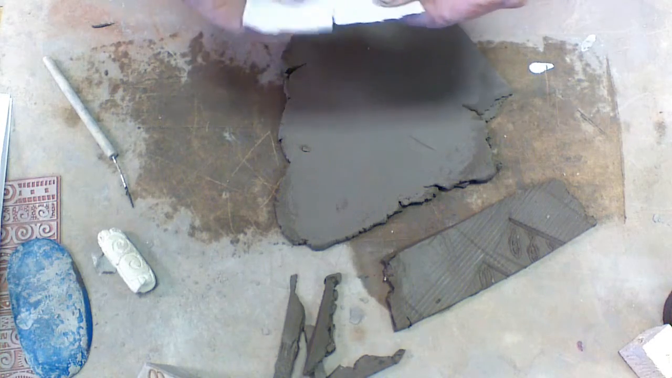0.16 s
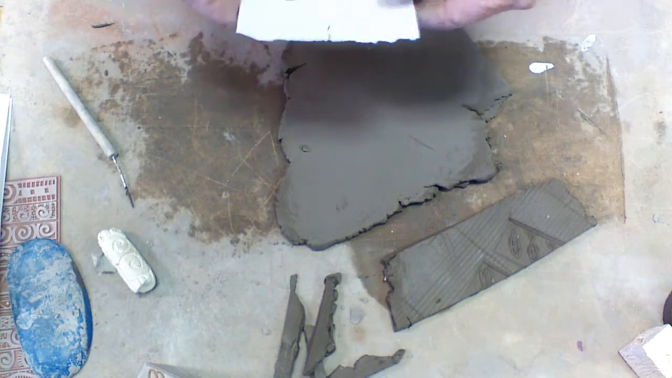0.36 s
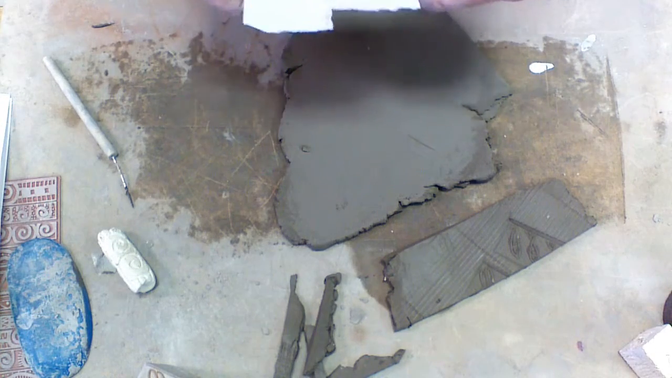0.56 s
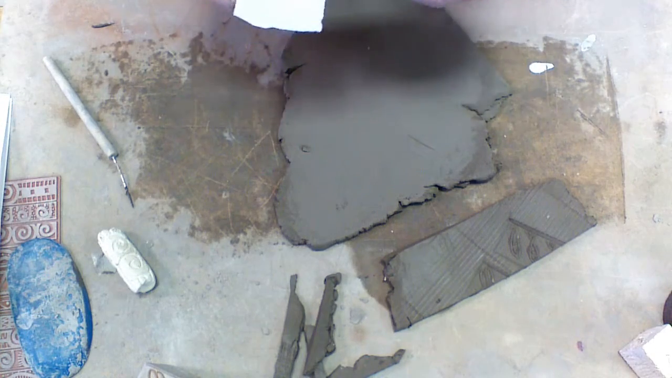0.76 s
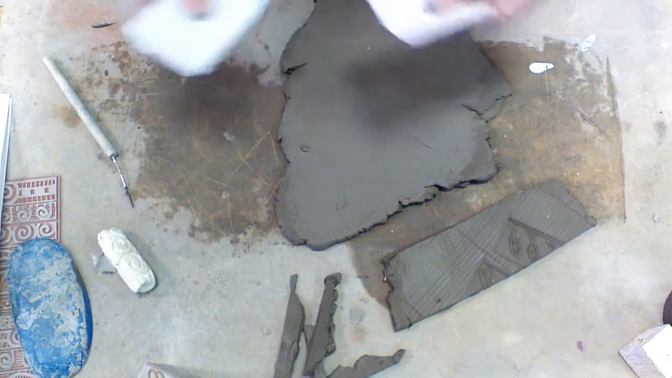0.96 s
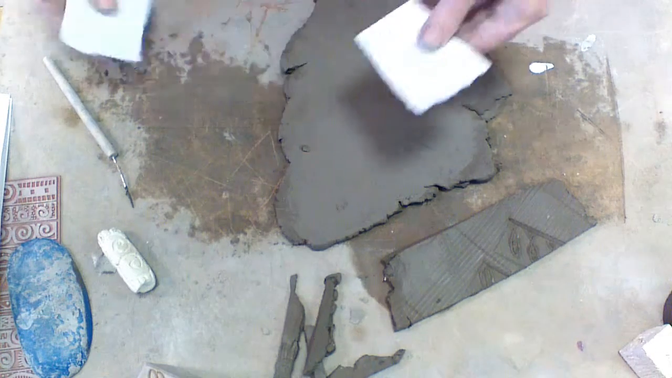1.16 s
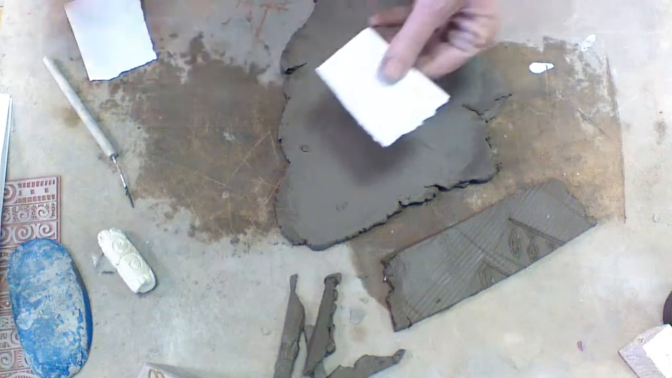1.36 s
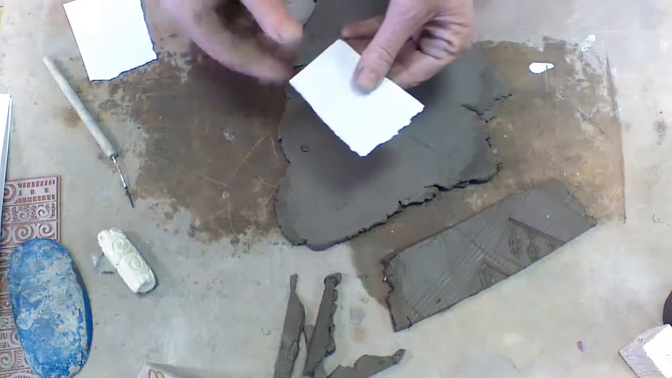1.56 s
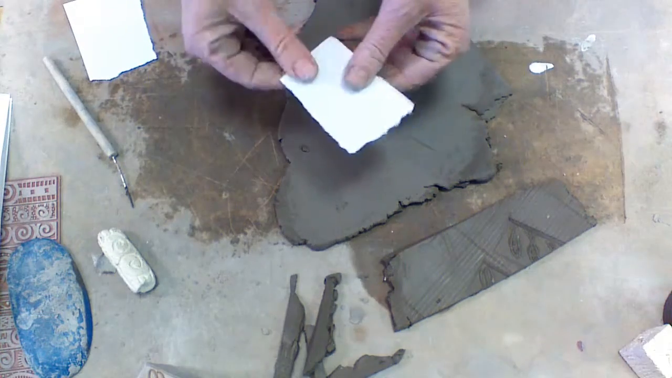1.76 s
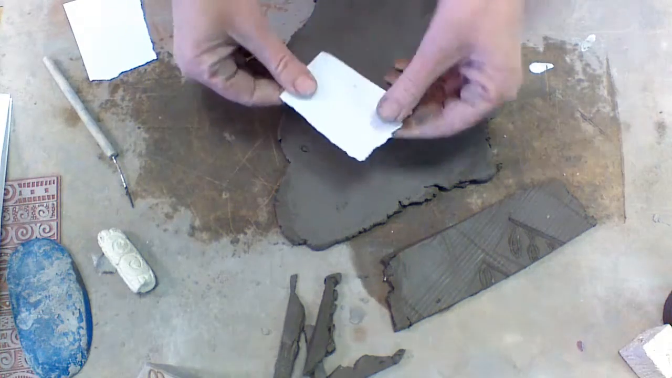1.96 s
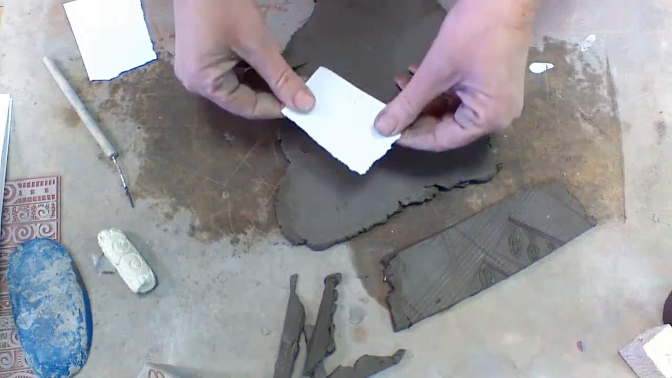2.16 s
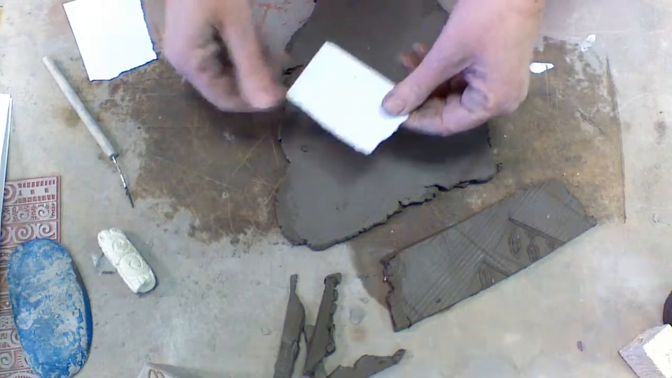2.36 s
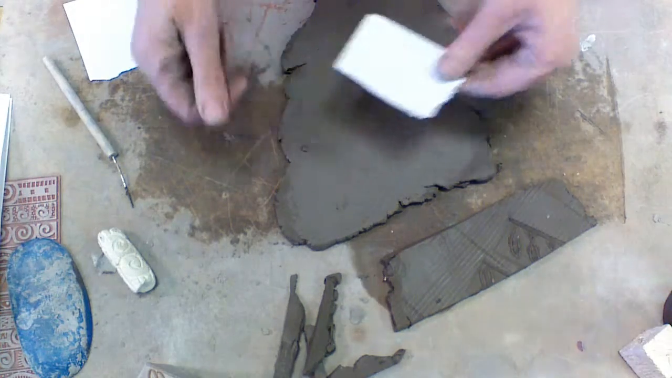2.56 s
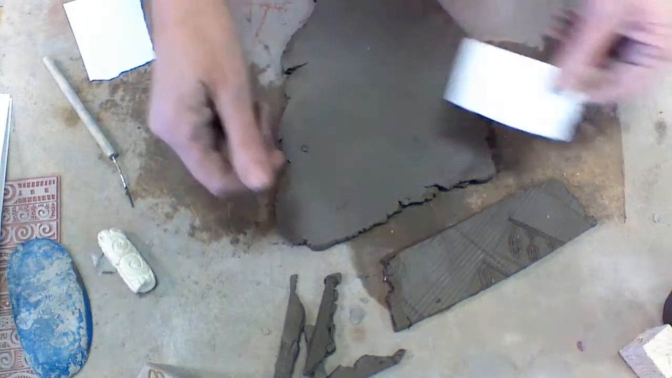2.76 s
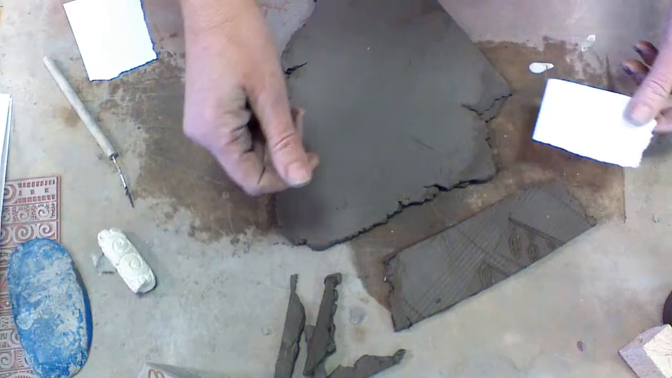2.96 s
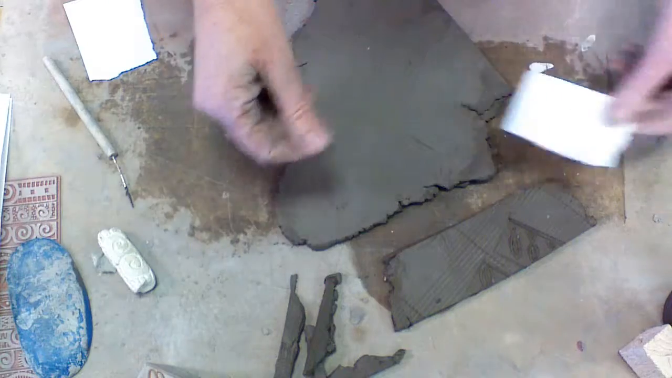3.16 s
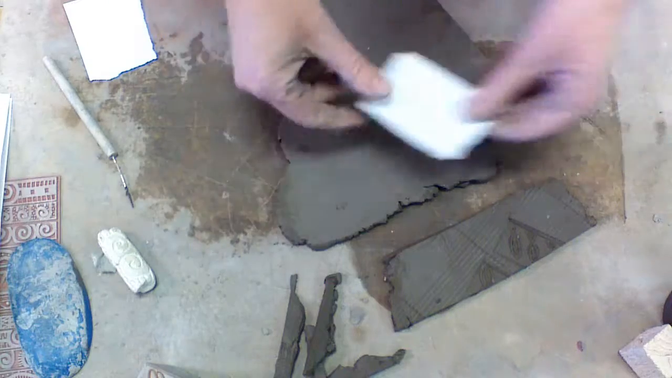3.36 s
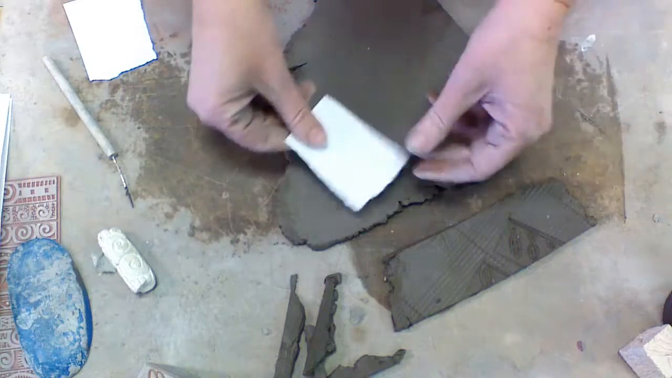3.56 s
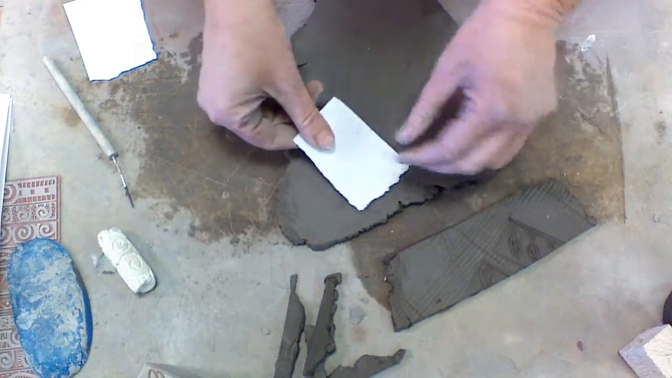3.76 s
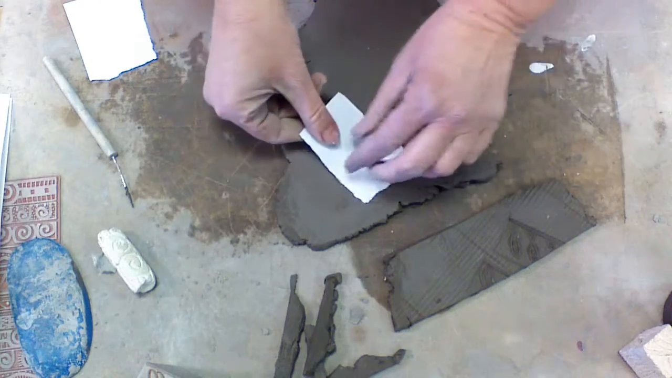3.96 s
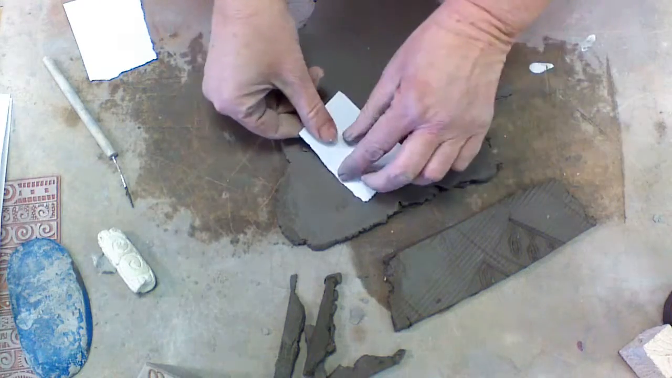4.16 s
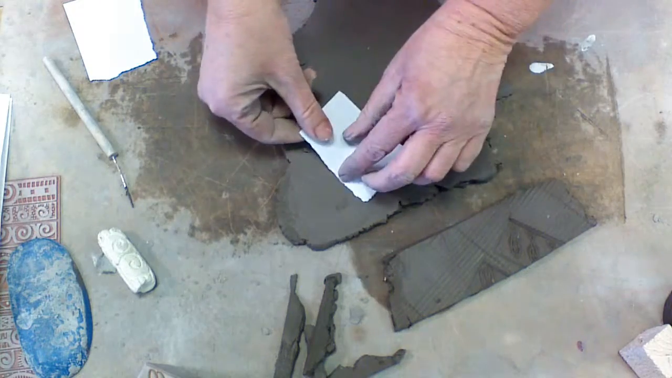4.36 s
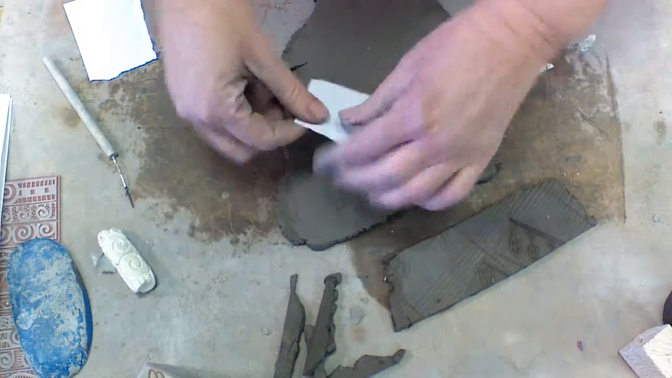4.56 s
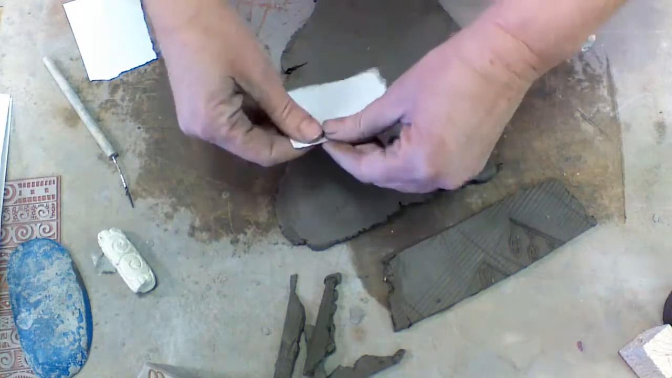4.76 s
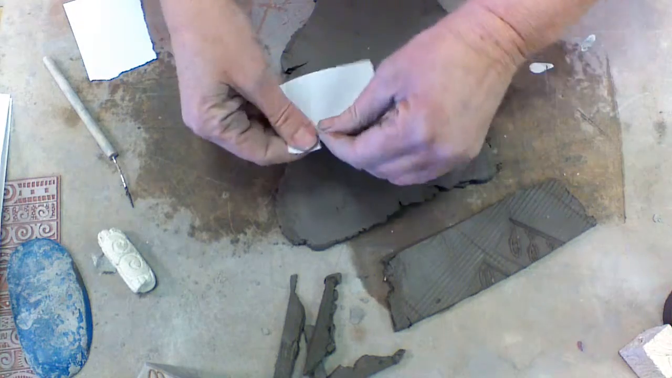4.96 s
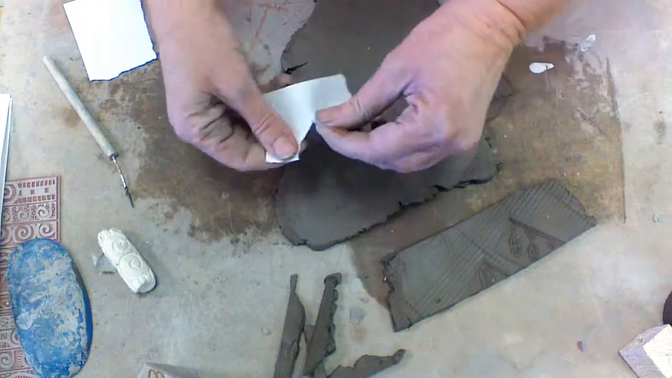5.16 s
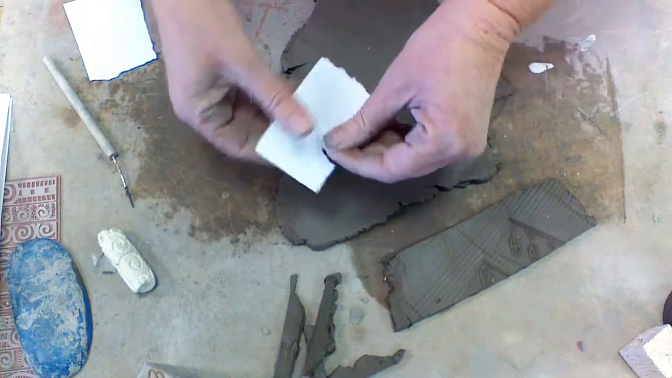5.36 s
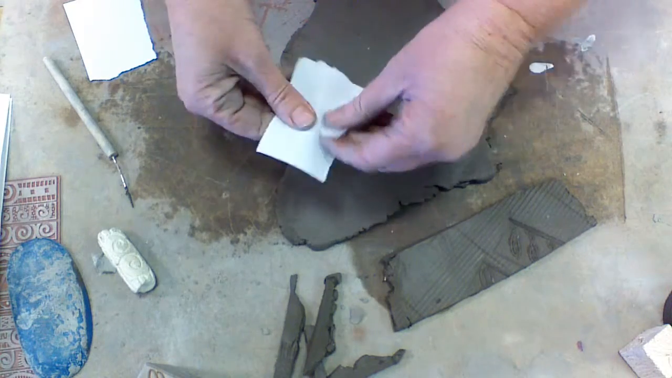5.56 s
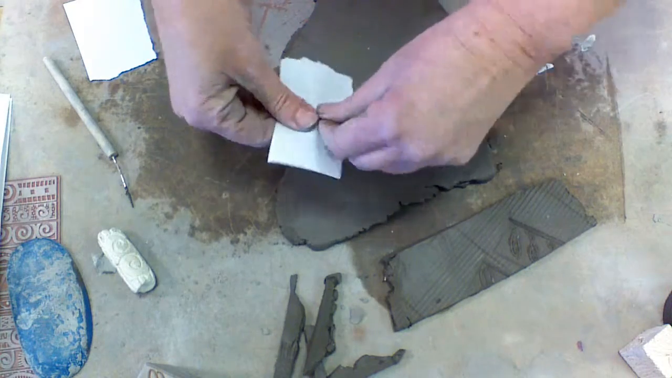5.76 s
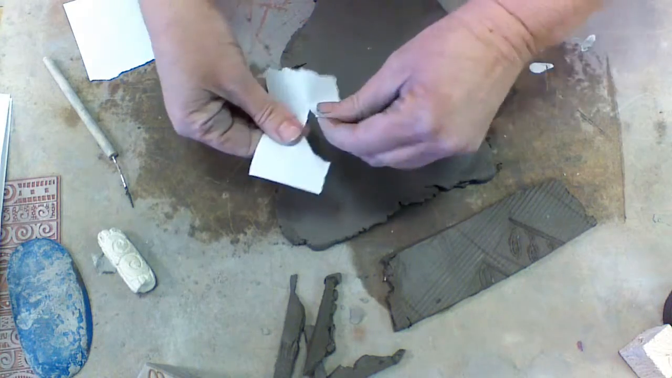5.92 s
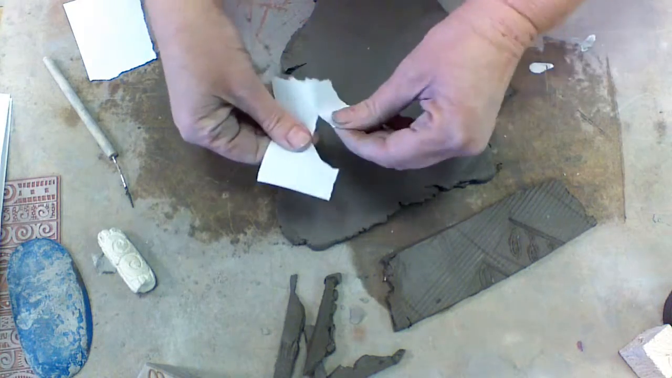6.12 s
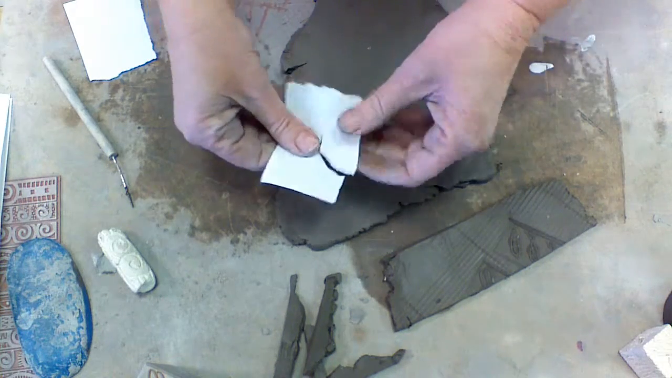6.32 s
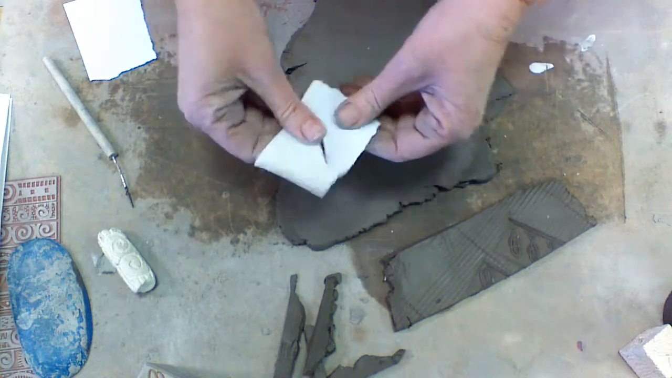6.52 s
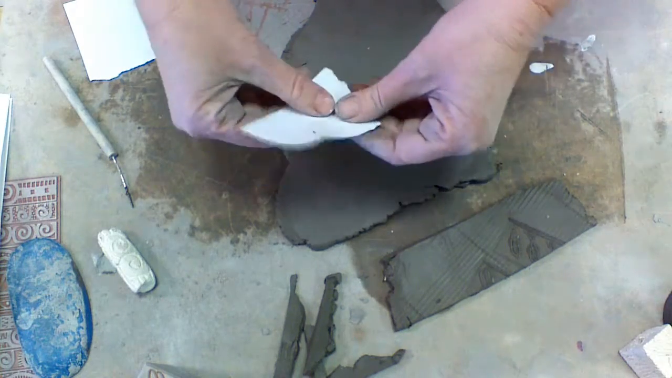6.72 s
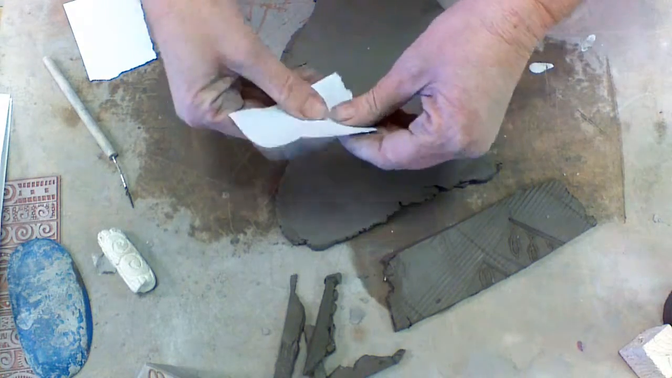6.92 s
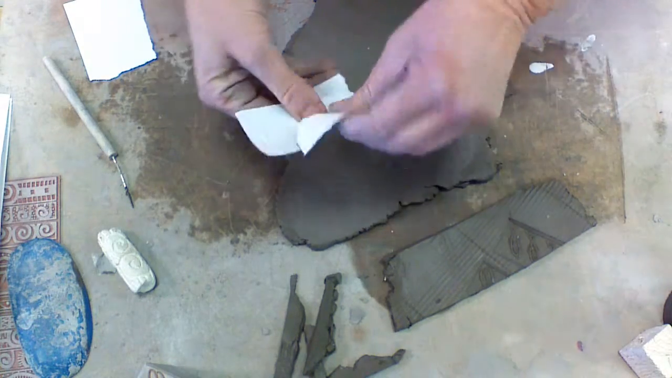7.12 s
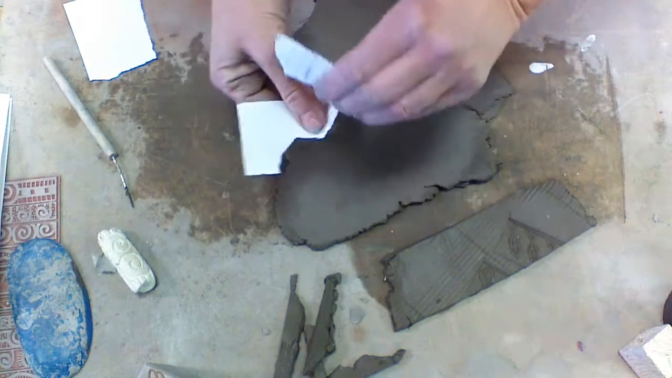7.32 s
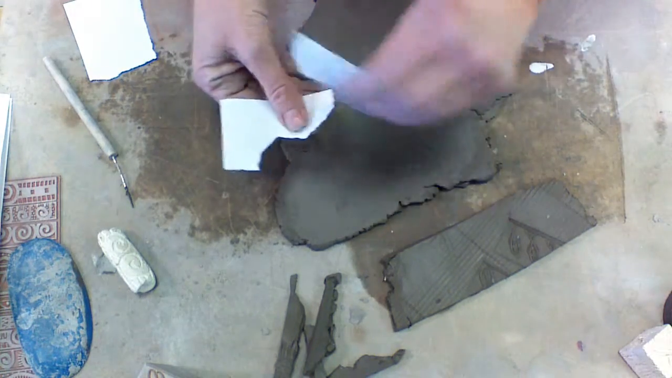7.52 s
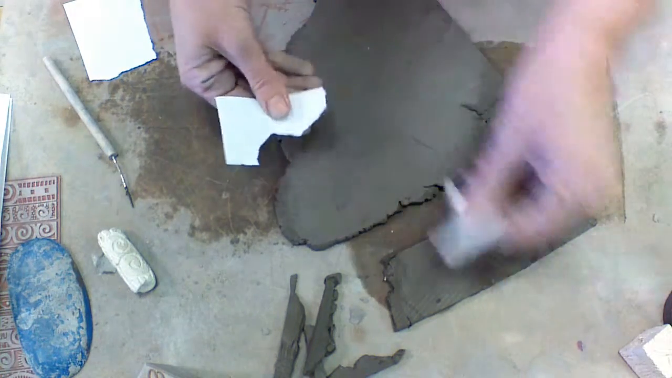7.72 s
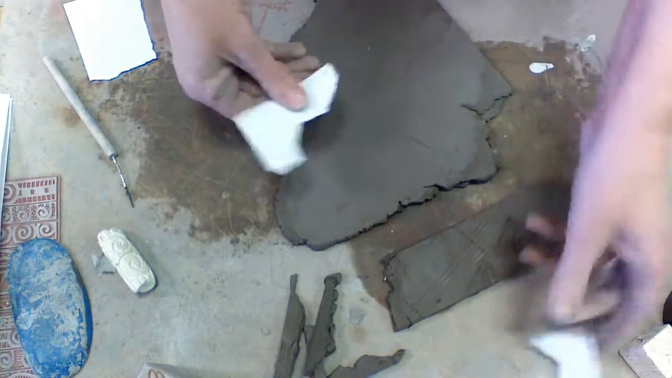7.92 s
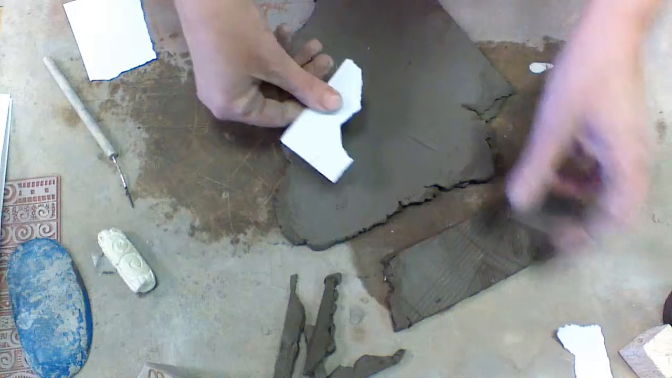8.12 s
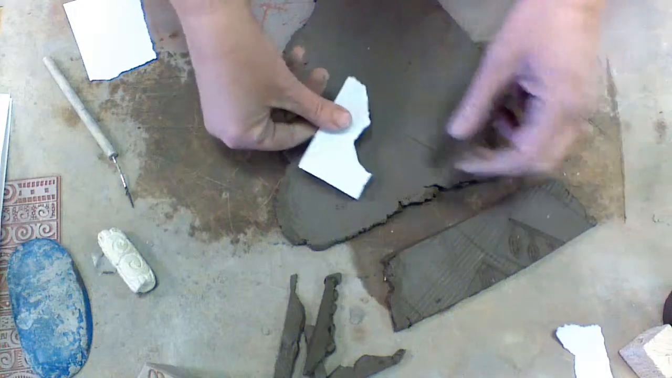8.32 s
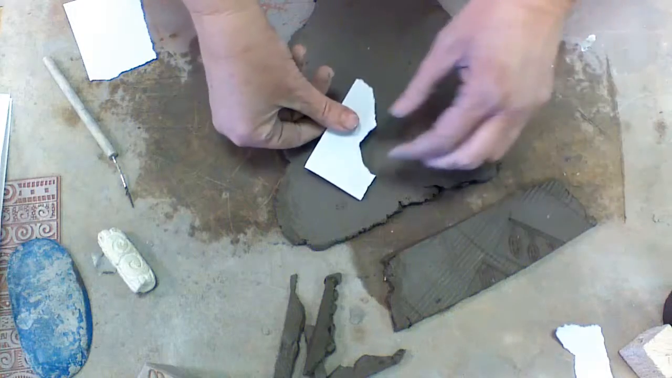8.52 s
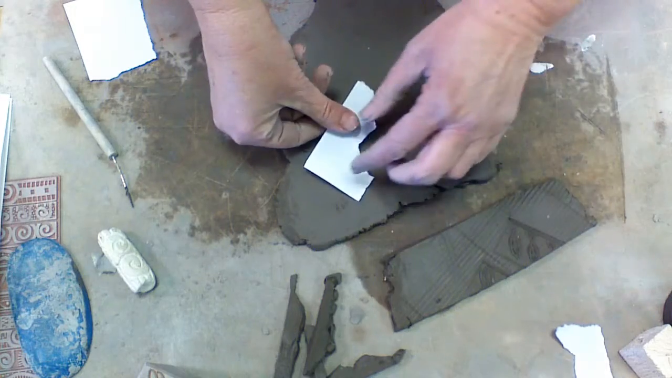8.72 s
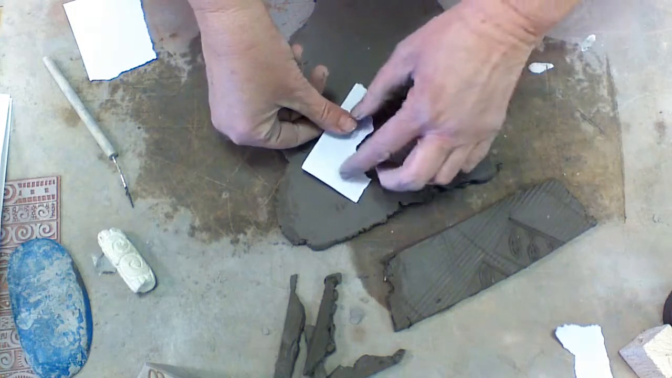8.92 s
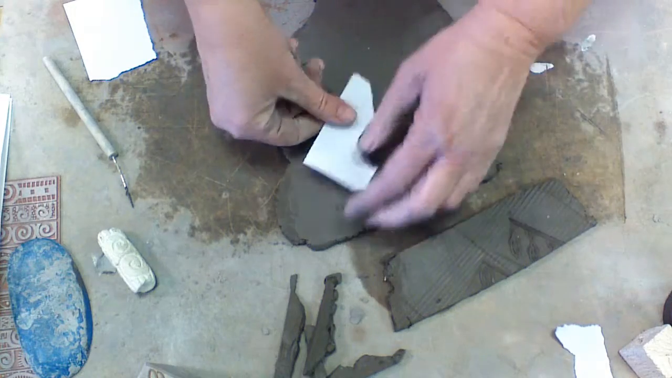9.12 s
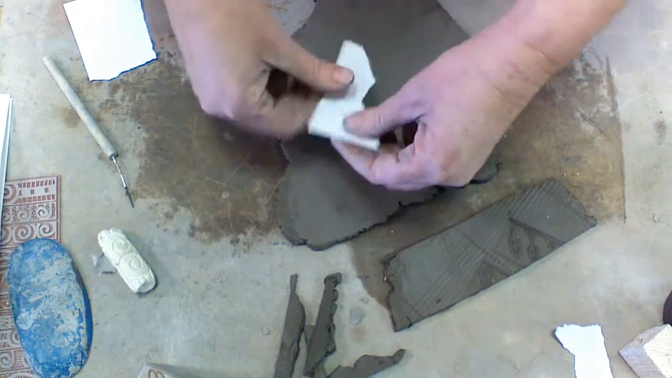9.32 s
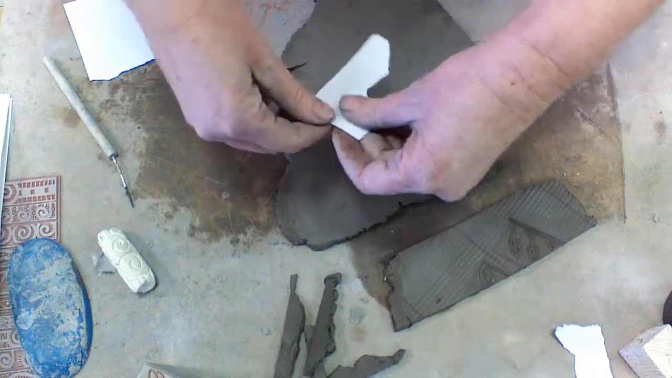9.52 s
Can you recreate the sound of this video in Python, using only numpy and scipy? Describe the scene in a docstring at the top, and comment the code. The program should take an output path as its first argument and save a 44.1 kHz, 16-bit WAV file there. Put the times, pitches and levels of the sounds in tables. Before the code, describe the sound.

Two hands tear stiff paper above a work table. Lively rustling opens, a quick rip comes within the first second, then near silence with soft rubs. Midway come bright bursts of tearing, a hard flick and crisp buckles, then another rip with a loud snap. Soft handling closes. Close stereo pickup, slight room reflections, steady low air rumble and hum.

```python
"""Tearing stiff paper

Two hands tear small pieces off a sheet of stiff paper above a work table, close to a pair of small microphones.
Breaking fibres are dense random clicks, thicker bundles short avalanches, sliding fingers a softer rustle;
buckles excite damped resonances, and a strip still holding rings at rising pitch.
Ventilation adds shaped noise, throbbing low modes and a hum of wavering sines."""
import sys
import numpy as np
from scipy import signal
from scipy.fft import rfft, irfft, next_fast_len
from scipy.io import wavfile
from scipy.ndimage import uniform_filter1d, map_coordinates

SR = 44100
rng = np.random.default_rng(int(sys.argv[2]) if len(sys.argv) > 2 else 0)


def transcribe(u):
    """Save the signal u as a 16-bit wav file named by the first command-line argument.

    u: samples, shape (n,) or (channels, n), limited to [-1, 1]; the rate is SR.
    q: integer samples, one column per channel.
    """
    v = np.clip(np.atleast_2d(u).T, -1, 1)
    q = np.round(v * 32767).astype(np.int16)
    wavfile.write(sys.argv[1], SR, q)


N = 426888
TIME = np.arange(N) / SR


def from_db(db):
    """Logarithmic level: 20 dB is a factor of ten in amplitude."""
    return 10 ** (np.asarray(db) / 20)


def rms_one(x):
    """Power normalization: scale to an rms of 1."""
    return x / np.sqrt(np.mean(x ** 2) + 1e-20)


def at_hz(points, hz):
    """Spectral interpolation: levels in dB run straight along a log-frequency axis."""
    f, db = np.transpose(points)
    return np.interp(np.log(hz + 1e-3), np.log(f), db)


def convolve(x, response):
    """Linear superposition: every sample of a sound launches the impulse response."""
    kernel = response if x.ndim == 1 else response[None]
    return signal.oaconvolve(x, kernel, axes=-1)[..., :N]


def colour(x, spectrum, size=16384):
    """Minimum-phase filtering: a causal response shapes the spectrum and keeps the power of white noise."""
    hz = np.arange(size // 2 + 1) * SR / size
    cepstrum = irfft(np.log(from_db(at_hz(spectrum, hz))))
    # folding the cepstrum onto positive times makes the response causal
    cepstrum[1:size // 2] *= 2
    cepstrum[size // 2 + 1:] = 0
    response = irfft(np.exp(rfft(cepstrum)))
    return convolve(x, response / np.linalg.norm(response))


def shade(x, spectrum, share=1):
    """Zero-phase equalization: gain by frequency, its decibels multiplied by share."""
    size = next_fast_len(N, True)
    hz = np.arange(size // 2 + 1) * SR / size
    gain = from_db(share * at_hz(spectrum, hz))
    return irfft(rfft(x, size) * gain, size)[:N]


def drift(per_s):
    """Band-limited chance: lines join per_s random values each second, at an rms of 1."""
    knots = rng.standard_normal(N // 8)
    return rms_one(np.interp(TIME * per_s, np.arange(len(knots)), knots))


def resonate(x, hz, width_hz):
    """Damped resonance: a two-pole mode with gain 1 at its peak."""
    r = np.exp(-np.pi * width_hz / SR)
    poles = [1, -2 * r * np.cos(2 * np.pi * hz / SR), r * r]
    return signal.lfilter([1, 0, -1], poles, x + 1e-18) * (1 - r * r) / 2


def two_sided(draw, apart):
    """Partial coherence: sources lie all over the paper, so each microphone hears a share of its own."""
    shared = np.sqrt(1 - apart) * draw()
    own = np.sqrt(apart) * np.array([draw(), draw()])
    return shared + own


def arch(start_s, swell_s, fade_s, depth_db, curve):
    """Movement envelope: it sets in depth_db under its peak, swells, fades as far again and stops."""
    late = TIME - start_s - swell_s
    during = (late > -swell_s) & (late < fade_s)
    from_peak = np.maximum(-late[during] / max(swell_s, 1e-4), late[during] / max(fade_s, 1e-4))
    gain = np.zeros(N)
    gain[during] = from_db(-depth_db * from_peak ** curve)
    return gain


def strokes(rows, depth_db, curve):
    """Energy addition: the powers of overlapping movements sum, at the fibres and in the body of the sheet."""
    fibres, body = np.zeros((2, N))
    for start_s, swell_s, fade_s, db, body_db in rows:
        power = (from_db(db) * arch(start_s, swell_s, fade_s, depth_db, curve)) ** 2
        fibres += power
        body += power * from_db(body_db) ** 2
    return uniform_filter1d(np.sqrt([fibres, body]), size=64)


def crackle(per_s, spread_db):
    """Random impulse process: clicks of uneven size at an even overall strength."""
    chance, size = rng.random((2, N))
    hit = chance < per_s / SR
    # the sign of the lean is the direction of the break; values near zero give the rare outlying sizes
    lean = 2 * size[hit] - 1
    rarity = np.minimum(-np.log(np.abs(lean) + 1e-9), 4)
    clicks = np.zeros(N)
    clicks[hit] = np.sign(lean) * from_db(spread_db * rarity)
    clicks[hit] /= np.sqrt(uniform_filter1d(clicks ** 2, size=700)[hit] + 1e-3)
    return clicks


def avalanche(swell_s, size=1800):
    """Avalanche of fracture: a flurry of tiny breaks swells for a moment, then dies away."""
    age = np.arange(size) / SR / max(swell_s, 1e-4)
    return (age * np.exp(1 - age)) ** 2 * rng.choice([-1, 1], size)


def place(times, levels_db, sounds):
    """Superposition in time: short sounds add where they overlap."""
    out = np.zeros(N + SR)
    for s, db, sound in zip(times, levels_db, sounds):
        at = max(round(s * SR), 0)
        out[at:at + len(sound)] += from_db(db) * sound
    return out[:N]


def bursts(times, levels_db, swell_s):
    """Separate fractures: one avalanche at each of the given times."""
    return place(times, levels_db, map(avalanche, np.broadcast_to(swell_s, len(times))))


# Colour of the air rumble. Each row: frequency in Hz, relative level in dB.
RUMBLE_COLOUR = [(12, -9.5), (22, 3), (40, -2), (52, -2), (68, -8.5), (84, -12), (112, -10), (150, -13.5),
                 (200, -17), (240, -20), (320, -30), (450, -34), (700, -50.5), (1500, -70)]
# Colour of the hiss. Each row: frequency in Hz, relative level in dB.
HISS_COLOUR = [(240, -29), (400, -2.5), (474, -4), (512, -13), (666, -6.5), (1010, -18.5), (1350, -11),
               (1460, -19), (2290, -25.5), (4180, -25), (4950, -25), (6640, -16), (10700, -24.5),
               (15000, -16), (16000, -15)]


def air_noise(rumble_db=-37.0, hiss_db=-56.5):
    """Broadband noise: low air rumble and faint hiss, each a filtered random signal."""
    low, high = rng.standard_normal((2, N))
    return from_db(rumble_db) * colour(low, RUMBLE_COLOUR) + from_db(hiss_db) * colour(high, HISS_COLOUR)


# Hum of the ventilation. Each row: frequency in Hz, rms level in dB before the microphone colour.
HUM_TONES = [(59.7, -41.5), (119.4, -49), (178, -60.5), (229, -58), (360, -72.5)]
# Air modes throbbing in the ventilation.
# Each row: frequency in Hz, width in Hz, rms level in dB before the microphone colour.
AIR_MODES = [(30, 2.66, -39.5), (37.2, 1.88, -40), (147.68, 5.4, -55.5)]
# Side of the air noise relative to its middle. Each row: frequency in Hz, level in dB.
SIDE_LEVEL = [(30, -15), (70, -20), (170, -18), (350, -9), (700, -2.5), (1400, 3.5), (3000, 6.5), (8000, 1),
              (15000, 3)]
# Microphone colour, of which each side takes a share. Each row: frequency in Hz, gain in dB for a share of 1.
BACKGROUND_BALANCE = [(1000, 0.5), (4500, 0), (6500, 5), (8200, 7), (11000, -3.5), (15000, -5)]


def background(waver_rad=0.39):
    """Noise-driven resonance and phase modulation: air modes throb and the hum wavers within the air noise."""
    hum, throb = np.zeros((2, N))
    for hz, db in HUM_TONES:
        phase = 2 * np.pi * hz * TIME + waver_rad * drift(per_s=7)
        hum += np.sqrt(2) * from_db(db) * np.sin(phase)
    for hz, width_hz, db in AIR_MODES:
        throb += from_db(db) * rms_one(resonate(rng.standard_normal(N), hz, width_hz))
    mid = air_noise() + hum + throb
    side = shade(air_noise(), SIDE_LEVEL)
    left = shade(mid + side, BACKGROUND_BALANCE, 0.75)
    right = shade(mid - side, BACKGROUND_BALANCE, -0.081)
    return np.array([left, right])


# Fingers and paper sliding over each other. Each row: start in seconds, swell in seconds, fade in seconds,
# level in dB before the layer gains, body of the sheet in dB relative to it before the layer gains.
SLIDES = [(0.0, 0.0051, 0.073, -39.5, -3.5), (0.085, 0.019, 0.065, -43, -15),
          (0.17, 0.016, 0.058, -46, -15), (0.243, 0.019, 0.05, -36.5, -9), (0.315, 0.0221, .018, -42, -9),
          (0.37, .07, 0.062, -48, -7), (0.5, .08, .09, -50, -12), (1.06, 0.077, 0.111, -53.5, -9),
          (1.28, .008, 0.0153, -55.5, -11), (1.785, 0.053, 0.0315, -54, -1),
          (2.035, .015, 0.037, -49.5, -5), (2.11, 0.066, 0.16, -51.5, -7), (2.275, .02, 0.062, -49.5, -2.5),
          (3.39, 0.047, 0.022, -51, -2), (3.475, 0.017, 0.038, -43, -7), (3.53, 0.0298, 0.019, -45.5, 0),
          (4.108, 0.014, 0.28, -48.5, -14), (4.645, 0.021, 0.057, -43.5, -8),
          (4.725, 0.034, 0.068, -48, -10), (5.18, .03, .04, -48, -6), (5.245, 0.011, 0.035, -36, -11),
          (5.265, 0.036, .014, -36.5, -14), (5.358, .015, .025, -48.5, 0),
          (5.41, 0.0132, 0.0356, -46.5, -2.5), (5.46, 0.0613, .018, -48.5, -4),
          (5.535, 0.031, .14, -40.5, -6), (5.712, .023, 0.015, -36, -11), (5.752, 0.032, 0.04, -40.5, -5.5),
          (5.79, 0.0553, 0.034, -42, -7.5), (6.295, 0.033, 0.032, -41.5, -8),
          (6.498, 0.012, 0.059, -40.5, -8), (6.54, 0.069, 0.065, -39.5, -7.5),
          (6.635, 0.056, 0.047, -41, -8), (6.73, 0.032, 0.13, -51, -9), (6.865, 0.0096, 0.03, -46, -12),
          (6.9, 0.058, 0.054, -47, -9), (7.6, 0.1, 0.052, -53, -10), (7.8, 0.044, 0.063, -44, -26),
          (7.915, .045, 0.051, -45, -11), (8.035, 0.057, 0.027, -49, -12),
          (9.255, 0.0705, 0.051, -42.5, -11), (9.475, .015, .04, -52, -2.5), (9.54, 0.06, .12, -50, -9)]
# Colour of the rubbed grain. Each row: frequency in Hz, relative level in dB.
RUB_COLOUR = [(1000, -13), (2300, -20), (3500, -15.5), (5000, -8.5), (6500, 1), (8300, -7.5),
              (11500, -14.5), (15500, -11.5)]
# Colour of the body of the sheet, also heard in tearing and snapping.
# Each row: frequency in Hz, relative level in dB.
BODY_COLOUR = [(300, -10), (650, -7.5), (950, -1), (1300, 5.5), (1700, 0), (2150, -2.5), (2800, 1),
               (3600, -1), (4600, -4), (6500, -12), (12000, -30)]


def rubbing(rub_db=3.0, body_db=-0.5, uneven_db=1.5):
    """Sliding friction: skin passes over the grain of the paper with a fine, soft rustle."""
    slide, shake = strokes(SLIDES, depth_db=13.5, curve=1.1)
    grip = rms_one(from_db(uneven_db * drift(per_s=180)))
    grain = two_sided(lambda: crackle(per_s=9000, spread_db=5.0), apart=0.31) * slide
    body = two_sided(lambda: crackle(per_s=4000, spread_db=1.0), apart=0.048) * shake
    return from_db(rub_db) * colour(grain * grip, RUB_COLOUR) + from_db(body_db) * colour(body * grip, BODY_COLOUR)


def pop(hz, swell_s, width_hz):
    """Impulsive excitation: an avalanche rings one patch of the sheet, scaled to a peak of 1."""
    ring = resonate(avalanche(swell_s), hz, width_hz)
    return ring / np.abs(ring).max()


# The sheet buckling or flicking free. Each row: time in seconds, level of the dull pop in dB before the
# layer gains, crisp edge in dB relative to it before the layer gains, pitch of the pop in Hz, swell in seconds.
BUCKLE_EVENTS = [(0.029, -28.5, -15, 934, 0.0028), (0.246, -39, 14, 993, .0014),
                 (0.26, -28, 12.5, 940, 0.0022), (0.286, -40.5, -8.5, 1210, 0.0018),
                 (0.465, -24.5, -2.5, 1067, 0.0023), (0.893, -24, 14, 960, 0.0027),
                 (1.73, -35.5, 0.5, 1100, 0.0027), (1.751, -28.5, -4.5, 1300, 0.0039),
                 (2.044, -41, -10, 1810, 0.0031), (3.446, -39, -8, 1700, 0.0034),
                 (3.559, -44, 5.5, 1270, .0018), (4.656, -37, -13, 1290, 0.0021),
                 (5.166, -31, 4, 1884, 0.0021), (5.256, -34, -14, 970, 0.0038), (5.317, -29, 7, 1286, .002),
                 (5.394, -31.5, 7.5, 1260, 0.0033), (5.495, -35, -10, 1500, .002),
                 (5.532, -16.5, 8.5, 1670, 0.0019), (6.337, -27, 3.5, 1120, 0.0025),
                 (6.557, -32.5, -7, 1290, 0.002), (6.611, -31, 4.5, 988, 0.00294),
                 (6.682, -25, -13, 1200, .0013), (6.988, -31.5, -4, 1110, 0.0013),
                 (7.124, -34.5, 4, 1300, .002), (7.198, -18.5, -1, 1370, 0.002),
                 (7.351, -36.5, 8, 1740, .0018), (7.389, -30, 3, 1300, 0.0019),
                 (9.294, -31, -14, 1120, 0.002)]
# Modes of the hand-held sheet. Each row: frequency in Hz, width in Hz, gain in dB.
HELD_SHEET_MODES = [(990, 156, 7.5), (1300, 320, 5), (1636, 190, 5.5), (2930, 210, -9), (3500, 440, -5)]
# Colour of the crisp edge. Each row: frequency in Hz, relative level in dB.
EDGE_COLOUR = [(500, -16), (1800, -12), (2700, -6), (3700, -1), (5000, -4.5), (6600, 8), (8300, -6.5),
               (11500, -13.5), (15500, -9)]


def buckling(pop_db=-3.5, edge_db=-6.5, pop_width_hz=340):
    """Snap-through instability: a patch flips with a pop and a crisp edge; the whole sheet rings briefly."""
    s, db, crisp_db, pitch_hz, swell_s = np.transpose(BUCKLE_EVENTS)
    patches = [pop(hz, swell, pop_width_hz) for hz, swell in zip(pitch_hz, swell_s)]
    pops = place(s, db + pop_db, patches)
    edge = two_sided(lambda: bursts(s, db + crisp_db + edge_db, swell_s), apart=0.26)
    push = bursts(s, db, swell_s)
    rings = np.zeros(N)
    for k, (hz, width_hz, mode_db) in enumerate(HELD_SHEET_MODES):
        rings += (-1) ** k * from_db(mode_db) * resonate(push, hz, width_hz)  # neighbouring modes oppose
    return pops + rings + colour(edge, EDGE_COLOUR)


# Rise of an avalanche when a bundle snaps, in tearing and in snapping.
SNAP_SWELL_S = 0.00095
# The tear running through the sheet. Each row: start in seconds, swell in seconds, fade in seconds,
# fibre level in dB, body of the sheet in dB relative to it before the layer gain.
TEAR_RUNS = [(0.839, 0.055, 0.01, -18.5, -17.5), (5.003, 0.066, 0.094, -23.5, -17),
             (5.11, 0.0283, 0.0466, -25, -15), (5.86, 0.079, 0.049, -23, -14),
             (7.07, 0.028, 0.016, -35, -14), (7.12, 0.034, 0.05, -29, -20),
             (7.174, 0.027, 0.041, -20.5, -15.5)]
# Colour of the tearing fibres. Each row: frequency in Hz, relative level in dB.
TEAR_COLOUR = [(1500, -30), (3500, -12.5), (5000, -7.5), (5900, -4), (6600, -1), (7400, -7.5), (9500, -7),
               (11600, -11.5), (14000, -11.5), (15600, -9.5)]
# Colour of snapping bundles, also heard in snapping. Each row: frequency in Hz, relative level in dB.
SNAP_COLOUR = [(400, -33), (1100, -19.5), (2200, -21.5), (3600, -16), (5400, -15), (6300, -2), (6900, 2.5),
               (7700, -8), (11500, -14), (15500, -9)]


def tearing(body_db=-1.0, catch_db=2.2, bundles_per_s=110, bundle_db=0.5, bundle_spread_db=4.5):
    """Running fracture: fibres break by the thousand and shake the sheet as the tear catches and runs on."""
    pull, shake = strokes(TEAR_RUNS, depth_db=16.0, curve=1.85)
    catching = rms_one(from_db(catch_db * drift(per_s=400)))
    fibres = two_sided(lambda: crackle(per_s=4500, spread_db=2.0), apart=0.43) * pull
    body = two_sided(lambda: crackle(per_s=2000, spread_db=2.0), apart=0.036) * shake
    # lesser bundles snap at random while the tear runs, at levels that follow the fibres
    at = np.flatnonzero((rng.random(N) < bundles_per_s / SR) & (pull > 1e-4))
    fibre_db = 20 * np.log10(pull[at])
    bundle_levels_db = bundle_db + fibre_db + bundle_spread_db * rng.uniform(-1.1, 1, N)[at]
    bundles = two_sided(lambda: bursts(at / SR, bundle_levels_db, SNAP_SWELL_S), apart=0.39)
    sheet = from_db(body_db) * colour(body * catching, BODY_COLOUR)
    return colour(fibres * catching, TEAR_COLOUR) + sheet + colour(bundles, SNAP_COLOUR)


# Thick fibre bundles giving way. Each row: time in seconds, level in dB before the layer gain.
BUNDLE_SNAPS = [(0.875, -5), (0.882, -7), (0.8943, -7.5), (4.1, -31), (4.423, -31), (4.921, -10.5),
                (4.932, -18.5), (4.9644, -15), (5.0088, -11), (5.0759, -10), (5.1192, -4), (5.134, -2),
                (5.1667, -11.5), (6.1473, -18), (6.1867, -24), (6.1997, -21), (6.2103, -12.5),
                (6.2222, -12.5), (6.227, -13.5), (7.082, -25), (7.1447, -17), (7.1915, 2), (7.211, -14),
                (7.2891, -16), (7.3115, -18.5), (7.3519, -20), (8.086, -26.5), (8.9506, -35), (9.641, -26)]
# The tear creeping on fibre by fibre. Each row: start in seconds, swell in seconds, fade in seconds,
# level in dB, body of the sheet in dB relative to it before the layer gain.
SLOW_PULLS = [(4.919, 0.0088, 0.021, -22.5, -15), (4.94, .015, 0.12, -32, -19),
              (6.195, 0.027, 0.022, -35, -8), (7.225, 0.033, .115, -33, -12.5),
              (7.35, 0.011, 0.034, -28.5, -12)]


def snapping(body_db=-6.0, snap_db=-7.5, catch_db=3.0):
    """Intermittent fracture: fibres go in little fits and tug at the sheet; thick bundles snap loudly."""
    s, db = np.transpose(BUNDLE_SNAPS)
    fits = rms_one(from_db(catch_db * drift(per_s=260)))
    pull, shake = strokes(SLOW_PULLS, depth_db=10.0, curve=1.8) * fits
    creep = two_sided(lambda: crackle(per_s=2000, spread_db=4.0), apart=0.27) * pull
    body = two_sided(lambda: crackle(per_s=750, spread_db=-0.5), apart=0.12) * shake
    snaps = two_sided(lambda: bursts(s, db + snap_db, SNAP_SWELL_S), apart=0.35)
    return colour(creep + snaps, SNAP_COLOUR) + from_db(body_db) * colour(body, BODY_COLOUR)


# The strip that still holds narrows and rings higher as the tear crosses it.
# Each row: start in seconds, swell in seconds, fade in seconds, level in dB before the layer gain,
# first pitch in Hz, last pitch in Hz.
HOLDING_STRIPS = [(5.05, 0.092, .028, -43.5, 1250, 2100), (5.885, 0.0293, 0.046, -37.5, 1174, 1673)]


def shrinking_strip(strip_db=-6.0, width_hz=220):
    """Narrowing resonator: breaking fibres keep the last strip ringing while its period shortens steadily."""
    out = np.zeros(N)
    for start_s, swell_s, fade_s, db, first_hz, last_hz in HOLDING_STRIPS:
        ends_s = [start_s, start_s + swell_s + fade_s]
        period_s = np.interp(TIME, ends_s, [1 / first_hz, 1 / last_hz])
        phase = 2 * np.pi * np.cumsum(1 / period_s) / SR
        ring = drift(per_s=width_hz) * np.cos(phase) + drift(per_s=width_hz) * np.sin(phase)
        out += from_db(db + strip_db) * ring * arch(start_s, swell_s, fade_s, depth_db=8.5, curve=1.7)
    return out


def bending(paper, depth_db=4.0, patch_hz=500, per_s=40, size=256):
    """Changing directivity: as the sheet bends, the pitches sent towards each microphone keep shifting."""
    hz, s, bands = signal.stft(paper, SR, nperseg=size)
    where = np.meshgrid(hz / patch_hz, s * per_s, indexing="ij")

    def patch_map():
        """Random field: smooth patches of level over frequency and time."""
        grid = rng.standard_normal((size // 2, N // 200))
        return rms_one(map_coordinates(grid, where, order=1, mode="wrap"))

    gain = rms_one(from_db(depth_db * two_sided(patch_map, apart=0.534)))
    return signal.istft(bands * gain, SR, nperseg=size)[1][:, :N]


def reflections(t60, start_s):
    """Diffuse reverberation: decaying noise of unit energy sets in after a short delay."""
    t = TIME[:SR]
    response = rng.standard_normal(SR) * from_db(-60 * t / t60) * (t > start_s)
    return response / np.linalg.norm(response)


# Colour of the room's walls. Each row: frequency in Hz, relative level in dB.
WALL_COLOUR = [(200, -11.5), (1200, -2), (4500, -3), (7000, -12.5), (10000, -12.5), (16000, -17)]
# Colour of the left microphone over the right one. Each row: frequency in Hz, difference in dB.
PAPER_BALANCE = [(1000, 0.5), (3500, -0.5), (5200, 2.5), (6600, -6), (8000, 5), (9200, -0.5), (12000, 0.5),
                 (15000, -0.5)]


def at_microphones(paper, left_lag_samples=1.0, near_db=-11.5, room_db=-19):
    """Direct and reflected sound: scatter from hands and table and the room's tail reach each microphone."""
    left = map_coordinates(paper[0], [np.arange(N) - left_lag_samples], order=3)
    pair = []
    for direct, share in ((left, 0.5), (paper[1], -0.5)):
        near = from_db(near_db) * reflections(t60=0.07, start_s=0.0004)
        tail = colour(reflections(t60=0.55, start_s=0.006), WALL_COLOUR)[:SR]
        room = from_db(room_db) * tail
        pair.append(shade(direct + convolve(direct, near + room), PAPER_BALANCE, share))
    return np.array(pair)


def scene():
    """Superposition of sources: the paper in the room, over the background."""
    rustle = bending(tearing() + rubbing())
    paper = rustle + shrinking_strip() + snapping() + buckling()
    return at_microphones(paper) + background()


def record(dry, ceiling=0.85, cutoff_hz=15800):
    """Soft saturation and band limiting: sharp peaks are rounded under the ceiling, the top is cut steeply."""
    rounded = dry / (1 + (dry / ceiling) ** 6) ** (1 / 6)
    low_pass = signal.ellip(12, 0.1, 90, cutoff_hz, fs=SR, output="sos")
    return signal.sosfilt(low_pass, rounded)


dry = scene()
out = record(dry)
transcribe(out)
```